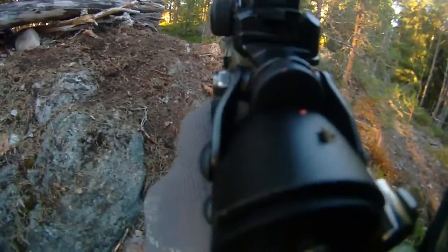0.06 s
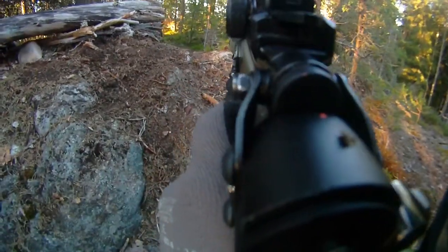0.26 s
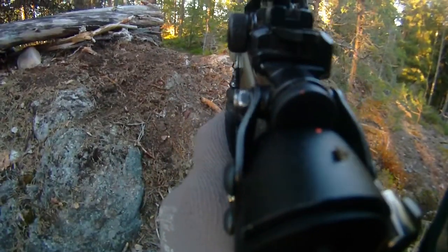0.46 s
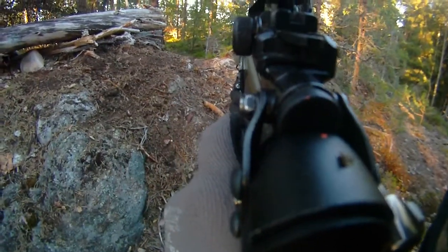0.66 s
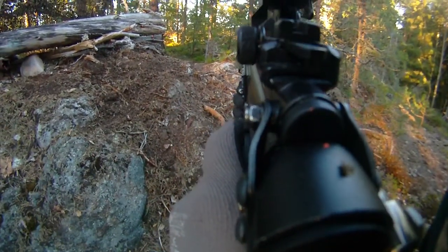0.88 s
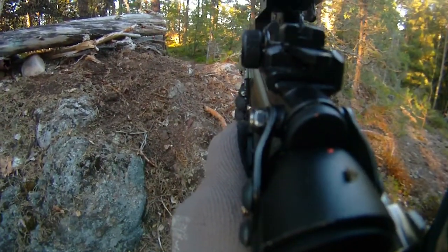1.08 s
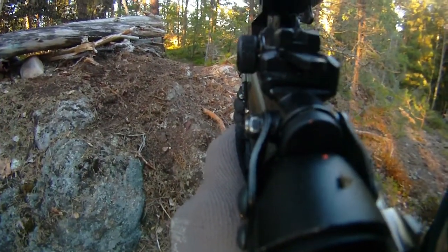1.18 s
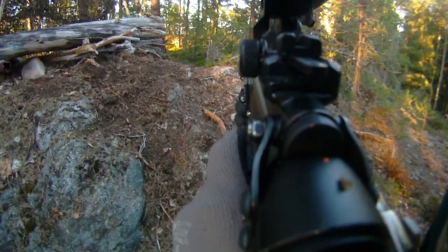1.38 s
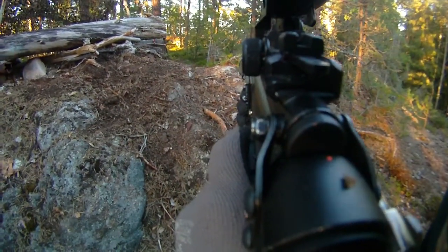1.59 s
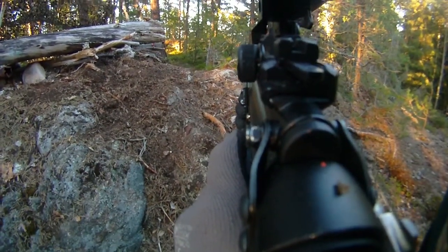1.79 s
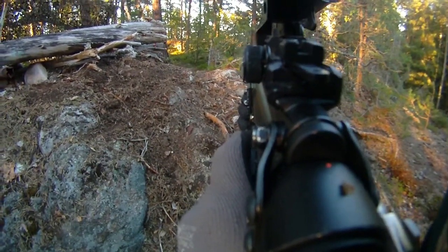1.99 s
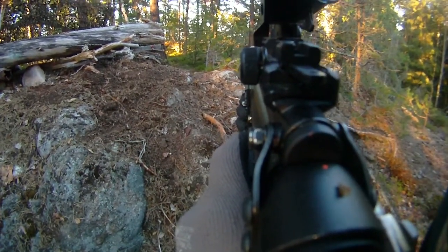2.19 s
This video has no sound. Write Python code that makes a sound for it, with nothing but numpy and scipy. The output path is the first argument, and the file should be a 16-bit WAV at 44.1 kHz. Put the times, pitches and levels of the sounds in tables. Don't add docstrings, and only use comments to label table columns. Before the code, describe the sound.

Seven harsh mechanical cracks from a paintball marker, very close and overloaded, with faint distant shots behind.

```python
import sys
import numpy as np
from scipy import signal
from scipy.io import wavfile
from scipy.ndimage import uniform_filter1d

SR = 44100
rng = np.random.default_rng(int(sys.argv[2]) if len(sys.argv) > 2 else 0)


def store_wav(level_fs):
    pcm = np.round(np.clip(np.atleast_2d(level_fs), -1, 1) * 32767)
    wavfile.write(sys.argv[1], SR, pcm.T.astype(np.int16))


def undo_db(level):
    steps = np.asarray(level, float) / 20
    return 10 ** steps


N = 99225


def evened(x):
    return x / np.sqrt(np.mean(x ** 2) + 1e-20)


def read(points, hz):
    f, value = np.transpose(points)
    return np.interp(np.log(hz + 1), np.log(f + 1), value)


def add(mix, s, sound):
    part = mix[round(s * SR):][:len(sound)]
    part += sound[:len(part)]


def split(dull, bright):
    split_hz = 1924
    low = signal.butter(3, split_hz, "low", fs=SR, output="sos")
    high = signal.butter(3, split_hz, "high", fs=SR, output="sos")
    return signal.sosfilt(low, dull) + signal.sosfilt(high, bright)


def knock(hold, t60):
    t = np.arange(6000) / SR
    white, grit = rng.standard_normal((2, 6000))
    white[0] += 2.5 * np.sign(white[0])
    grit_db = 1.5 * evened(uniform_filter1d(grit, 40))
    return white * undo_db(grit_db - 60 * np.maximum(t - hold, 0) / t60)


def pulse(width):
    u = np.arange(6000) / SR / width
    return (u - 1) * np.exp(-u)


def rings(modes, low_hz):
    t = np.arange(6000) / SR
    sound = np.zeros(6000)
    for hz, db, t60 in modes:
        this_hz = hz * rng.uniform(.985, 1.015)
        sound += undo_db(db - 60 * t / t60) * np.sin(2 * np.pi * this_hz * t)
    return signal.sosfilt(signal.butter(3, low_hz, "high", fs=SR, output="sos"), sound)


def wash(x, t60, start):
    hz, t, z = signal.stft(rng.standard_normal(SR), SR, nperseg=256)
    tail = signal.istft(z * undo_db(-60 * t / t60(hz)[:, None]), SR, nperseg=256)[1]
    tail = tail * np.clip(np.arange(len(tail)) / SR / start - 1, 0, 1)
    return signal.fftconvolve(x, tail / np.linalg.norm(tail))[:N]


def patchy(colour, patch_db):
    frames, hz = N // 128 + 5, np.fft.rfftfreq(512, 1 / SR)
    a, b, patches = rng.standard_normal((frames, 257, 3)).T
    patches = evened(uniform_filter1d(uniform_filter1d(patches, 8, 0), 12, 1))
    level_db = read(colour, hz)[:, None] + patch_db * patches
    return signal.istft((a + 1j * b) * undo_db(level_db), nperseg=512, noverlap=384)[1][:N]


# (frequency [Hz], width [Hz], level [dB])
CASE_RESONANCES = [(356.4, 86, -15), (629, 315, -11.5), (873, 196, -5), (1139, 114, 1), (1418, 256, 6.5),
                   (1823, 210, -3), (2595, 330, -0.5), (3372, 140, -2.5), (4885, 800, 1.5), (5530, 996, -8),
                   (7800, 900, -54.5)]
# (frequency [Hz], level [dB])
CASE_LEAK = [(30, -47), (200, -38), (1000, -14), (4000, -23), (7000, -21), (10000, -27), (15000, -27)]


def case(x):
    hz = np.fft.rfftfreq(8192, 1 / SR)
    power = undo_db(2 * read(CASE_LEAK, hz))
    for f, width, db in CASE_RESONANCES:
        power = power + undo_db(2 * db) / (1 + (2 * (hz - f) / width) ** 2) ** 1.502
    log_gain = np.log(power) / 2
    full = signal.hilbert(np.concatenate([log_gain, log_gain[-2:0:-1]]))
    response = np.fft.ifft(np.exp(np.conj(full))).real[:4096]
    return signal.oaconvolve(x, response)[:N]


# (frequency [Hz], level [dB])
WOOD_STIR = [(30, -10.5), (150, -10.5), (600, 14), (2000, 5), (5000, -2), (9000, -2), (15000, -7)]
# (frequency [Hz], level [dB])
PORT_WIND = [(25, -5), (60, 13), (150, -4.5), (300, -5.5), (600, -25), (20000, -49)]


def air():
    stir = undo_db(-53.5) * evened(case(patchy(WOOD_STIR, patch_db=3)))
    wind = undo_db(-62.5) * evened(patchy(PORT_WIND, patch_db=3))
    waver = 1 + .3 * evened(uniform_filter1d(rng.standard_normal(N), 700))
    whine = undo_db(-82) * np.sin(2 * np.pi * 7860 * np.arange(N) / SR) * waver
    return stir + wind + whine


# (time [s], level [dB], dull part [dB], wash [dB])
FAR_SHOTS = [
    (0.0621, -18, 3, -4.5),
    (0.5019, -6.5, -6.5, -10),
    (1.1838, -14.5, 2, -6.5),
    (1.756, -15, 4.5, -5),
]
# (delay [s], level [dB])
FAR_ECHOES = [(.0012, -11.5), (.003, -6.5), (.0042, -9.5), (.0058, -12.5), (.009, -7.5), (0.0122, -24)]
# (frequency [Hz], time to fall 60 dB [s])
FAR_WASH = [(150, .2), (600, 0.1), (1500, 0.52), (5000, 0.37), (12000, 0.25)]
# (frequency [Hz], level [dB], time to fall 60 dB [s])
FAR_BARREL = [(1479, -1.5, 0.022), (3920, -5, 0.015), (704, -6.5, 0.015), (400, -20, 0.0067)]


def far_markers():
    dull, bright, wet, barrel = np.zeros((4, N))
    for s, db, dull_db, wash_db in FAR_SHOTS:
        puff = undo_db(-26) * knock(hold=0.0047, t60=.05)
        sound = undo_db(db + 20.5) * (pulse(width=.00008) + puff)
        for delay, echo_db in [(0.0012, 0.0049), *FAR_ECHOES]:
            echo = undo_db(echo_db) * sound * rng.choice([-1, 1])
            at = s + delay * rng.uniform(0.72, 1.0)
            add(dull, at, undo_db(dull_db) * echo)
            add(bright, at, echo)
        add(wet, s, undo_db(wash_db) * sound)
        add(barrel, s, undo_db(db) * rings(FAR_BARREL, low_hz=285))
    air_loss = signal.butter(1, 10800, fs=SR)
    direct = signal.lfilter(*air_loss, split(dull, bright))
    airy = signal.lfilter([1, -0.81], 1, wet)
    trees = wash(airy, lambda hz: read(FAR_WASH, hz), start=0.0033)
    return case(direct + trees) + barrel


# (frequency [Hz], level [dB], time to fall 60 dB [s])
TWIG_PARTIALS = [(1470, -28, .035), (1850, -28, .018), (2450, -31, .014), (4900, -28, .012),
                 (7700, -44, .005)]


def twig():
    out = np.zeros(N)
    add(out, 1.4485, rings(TWIG_PARTIALS, low_hz=1190))
    return out


# (time [s], level [dB], time to fall 60 dB [s])
GEAR_RATTLES = [(0.044, -47, 0.091), (.1546, -38.5, 0.013), (.325, -47, 0.078), (0.354, -45, 0.033),
                (0.47, -42, 0.01), (0.787, -42.5, 0.035), (1.097, -45.5, 0.043), (1.164, -53, 0.025),
                (2.2167, -65, 0.028)]


def rattles():
    out = np.zeros(N)
    for s, db, t60 in GEAR_RATTLES:
        add(out, s, undo_db(db + 4) * knock(0.0043, t60))
    return out


# (sear release time [s], tank ring [Hz], tank ring level [dB])
SHOTS = [(.1876, 2696, -40), (.3945, 2692, -31), (.6605, 2689, -42), (.9597, 2682, -39),
         (1.2447, 2682, -40), (1.5435, 2677, -34), (1.9077, 2674, -29)]
# (frequency [Hz], level [dB], time to fall 60 dB [s], flutter [0-1])
FRAME_RINGS = [(2908, -48, .3, .05), (266, -52, .33, .3), (600, -51, .33, .8), (810, -48, .1, .3),
               (1040, -47, .09, .3), (7860, -72, .4, .3)]


def tank():
    out, t = np.zeros(N), np.arange(SR // 2) / SR
    start_s, tank_t60, tank_flutter = .048, .46, .04
    for s, ring_hz, ring_db in SHOTS:
        for hz, db, t60, flutter in [(ring_hz, ring_db, tank_t60, tank_flutter), *FRAME_RINGS]:
            waver = 1 + flutter * evened(uniform_filter1d(rng.standard_normal(len(t)), 900))
            swell = np.minimum(t / .004, 1)
            tone = np.sin(2 * np.pi * (hz * t + rng.random()))
            add(out, s + start_s, waver * undo_db(db - 60 * t / t60) * swell * tone)
    return out


# (frequency [Hz], level [dB], time to fall 60 dB [s])
BARREL_THUMP = [(356, -30.5, 0.017), (470, -12, 0.018), (773, -11, 0.027), (900, -6, 0.028)]


def thump():
    out = np.zeros(N)
    for s, _, _ in SHOTS:
        add(out, s + .0222, rings(BARREL_THUMP, low_hz=230))
    return out


STEP_DELAYS = [-.0028, 0., .0085, .0165, .0202, .0222, .0258, .0336, .0388, .043]
# (dull part [dB], bright part [dB], hold [s], time to fall 60 dB [s])
FIRING_STEPS = [(-50, -33, .002, .02), (-19, -18, .002, .05), (-24, -22, .001, .025), (-28, -26, .004, .05),
                (-21, -19, .0015, .02), (-8, -2, .002, .016), (-6, -5, .002, .028), (-14, 1, .0012, .014),
                (-8, -1, .002, .018), (-14, -14, .002, .035)]
# (time [s], level [dB])
BOLT_RETURNS = [(.2374, -3), (.4452, 0), (.7105, -1), (1.0126, -1), (1.2935, -1), (1.5935, 0), (1.9573, 0)]
# (delay [s], dull part [dB], bright part [dB], hold [s], time to fall 60 dB [s])
BOLT_SETTLES = [
    (0., -12, -1, .0018, .011),
    (.002, -16, -22, .002, .04),
    (.008, -19, -23, .002, .062),
]


def marker():
    dull, bright = np.zeros((2, N))
    firing = [(delay, *row) for delay, row in zip(STEP_DELAYS, FIRING_STEPS)]
    scatter_s, scatter_db = .0002, 1
    for (s, _, _), (back, back_db) in zip(SHOTS, BOLT_RETURNS):
        for start, db, steps in ((s, 0, firing), (back, back_db, BOLT_SETTLES)):
            for delay, dull_db, bright_db, hold, t60 in steps:
                a, b, c = rng.standard_normal(3)
                at = start + delay + scatter_s * c
                add(dull, at, undo_db(db + dull_db + scatter_db * a) * knock(hold, t60))
                add(bright, at, undo_db(db + bright_db + scatter_db * b) * knock(hold, t60 / 1.2))
    frame = signal.butter(1, 7540, fs=SR)
    return undo_db(10) * signal.lfilter(*frame, split(dull, bright))


# (frequency [Hz], time to fall 60 dB [s])
TRUNK_ECHO = [(150, 0.46), (600, 0.77), (1500, 0.15), (5000, 0.36), (12000, 0.2)]


def wood_echo(own):
    trunks = undo_db(-34) * wash(own, lambda hz: read(TRUNK_ECHO, hz), start=0.0059)
    late = undo_db(-43) * wash(own, lambda hz: 1.5 + 0 * hz, start=0.082)
    return trunks + late


def scene():
    own = marker()
    cased = case(own + wood_echo(own) + rattles())
    return (cased + far_markers() + twig() + thump() + tank() + air())[None]


def low_pass(x):
    return signal.sosfilt(signal.butter(12, 16180, fs=SR, output="sos"), x)


def record(dry):
    x = undo_db(-1.5) * dry
    knee = 8
    x = x / (1 + abs(x) ** knee) ** (1 / knee)
    x = signal.lfilter(*signal.butter(1, 220, "high", fs=SR), x)
    top = signal.firwin(101, 15650, window=("kaiser", 5), fs=SR)
    x = signal.oaconvolve(x, top[None], "same")
    return low_pass(x)


dry = scene()
out = record(dry)
store_wav(out)
```